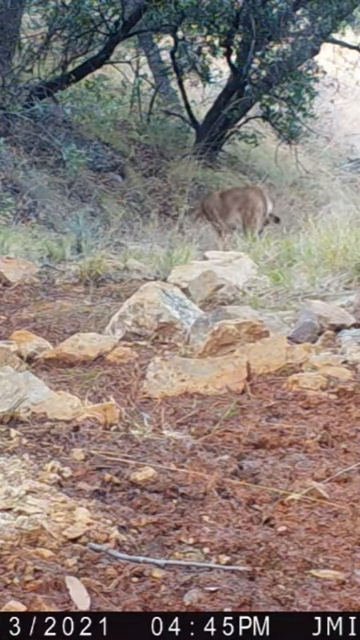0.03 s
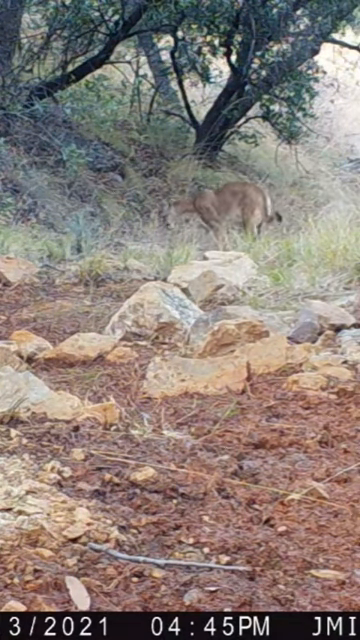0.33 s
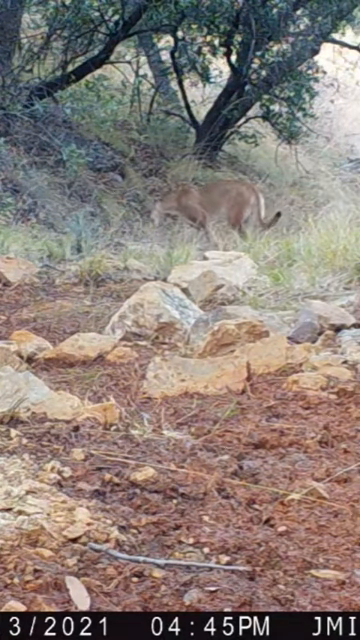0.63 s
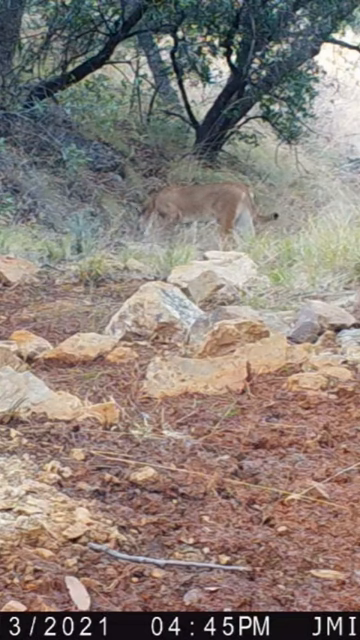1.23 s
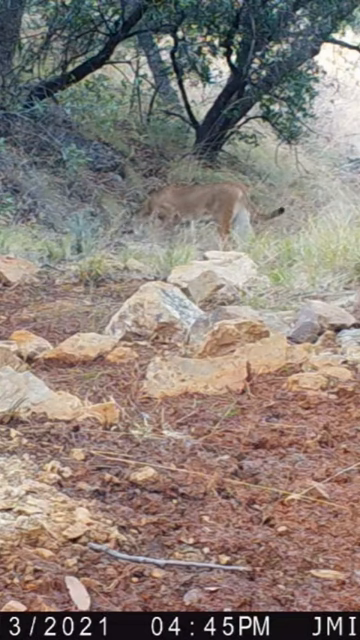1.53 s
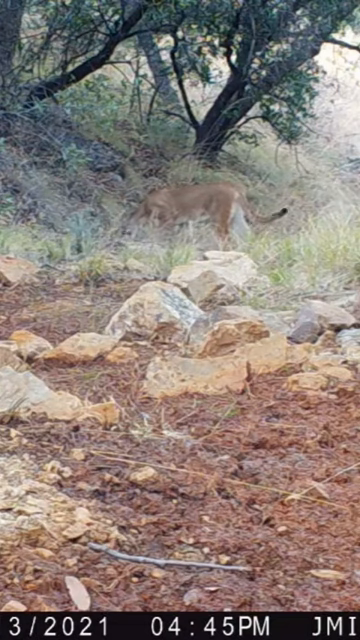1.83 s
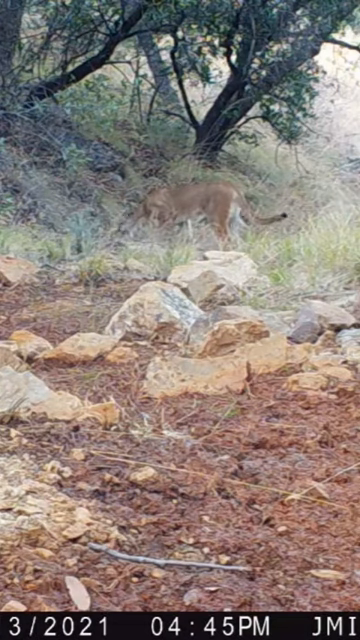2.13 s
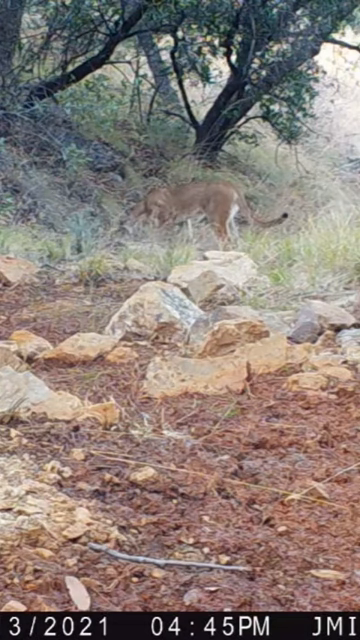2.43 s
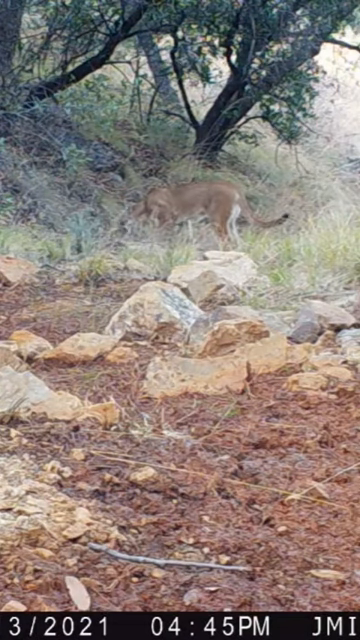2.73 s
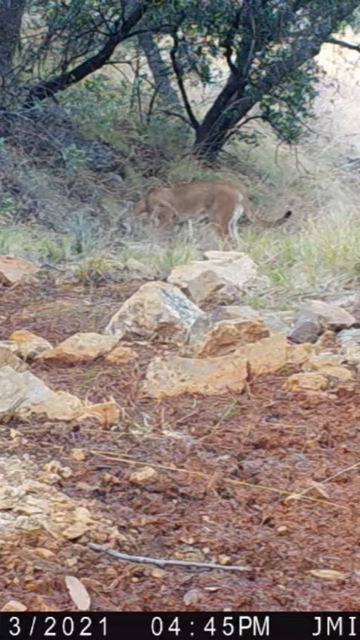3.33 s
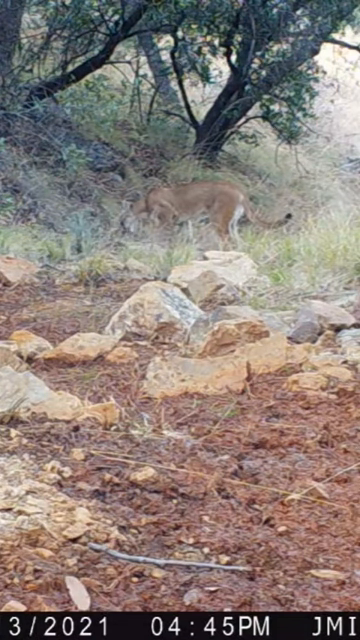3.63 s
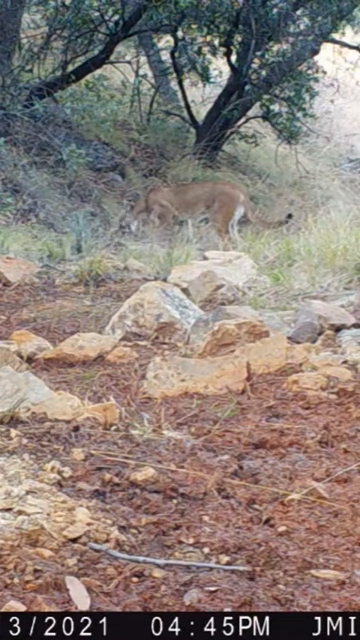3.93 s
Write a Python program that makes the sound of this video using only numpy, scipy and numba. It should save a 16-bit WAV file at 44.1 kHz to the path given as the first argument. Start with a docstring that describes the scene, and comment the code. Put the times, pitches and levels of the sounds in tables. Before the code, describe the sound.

Four hoarse, hissing screams from a big cat, most sinking into a rough yowl.

```python
"""A cougar screams four times in a wooded gully, heard by a trail camera over faint steady noise.
Each cry opens as a rasping hiss, jaws wide: air chopped by the throat rings the mouth resonances.
The first three sink into a rough, voiced yowl as the mouth closes. The slopes echo briefly,
dry grass rustles softly, and the hiss overloads the camera's microphone amplifier."""
import sys
import numpy as np
from scipy import signal
from scipy.fft import rfft, irfft
from scipy.io import wavfile
from scipy.ndimage import map_coordinates
from numba import njit

SR = 44100
rng = np.random.default_rng(int(sys.argv[2]) if len(sys.argv) > 2 else 0)


def dump(signal):
    """Clip the signal to [-1, 1] and save it as 16-bit WAV at the path in sys.argv[1]."""
    limited = np.clip(np.atleast_2d(signal).T, -1, 1)
    pcm = np.round(limited * 32767).astype(np.int16)
    wavfile.write(sys.argv[1], SR, pcm)


N = 176400
T = np.arange(N) / SR


def scream():
    """Rasping breath drives throat and hiss; the jaws open and close, moving the resonances."""
    # breath, one curve per cry: time_s, throat_db, hiss_db
    cries = [
        [(1.408, -40, -60), (1.422, -31.5, -38), (1.472, -21.5, -43), (1.53, -21, -45), (1.556, -17.5, -37),
         (1.57, -19, -64), (1.618, -19, -46), (1.7, -31.5, -51.5)],
        [(2.015, -45.5, -43.5), (2.051, -23, -31.5), (2.067, -23.5, -23.5), (2.175, -13.5, -29),
         (2.253, -16.5, -42), (2.337, -25.5, -45.5), (2.357, -22, -46), (2.365, -33, -52.5), (2.375, -29, -49),
         (2.385, -24.5, -52), (2.417, -25.5, -49), (2.495, -32.5, -61)],
        [(2.915, -46.5, -55), (2.959, -22, -23), (3.029, -19, -21.5), (3.129, -14, -28.5), (3.177, -13.5, -35),
         (3.221, -19, -40), (3.245, -18, -39.5), (3.267, -19, -40.5), (3.349, -26.5, -51), (3.361, -47, -50),
         (3.369, -21, -51), (3.41, -33.5, -58)],
        [(3.85, -47, -52), (3.882, -28, -23.5), (3.894, -19.5, -24.5), (3.922, -23, -22), (3.934, -13, -25),
         (3.944, -22, -21.5), (3.995, -19, -23)],
    ]
    # mouth resonances, one curve per cry: time_s, first_hz, second_hz
    mouths = [
        [(1.39, 750, 2200), (1.425, 1160, 2300), (1.465, 1250, 2480), (1.505, 1515, 2390), (1.555, 1315, 1950),
         (1.61, 926, 1410), (1.71, 693, 1160)],
        [(2.01, 716, 2030), (2.05, 1230, 2080), (2.11, 1590, 2540), (2.18, 1510, 2160), (2.25, 966, 1480),
         (2.34, 730, 1260), (2.5, 587, 1060)],
        [(2.91, 600, 2070), (2.96, 1480, 2320), (3.06, 1685, 2303), (3.125, 1495, 1965), (3.175, 932, 1550),
         (3.25, 804.3, 1247), (3.42, 630, 1050)],
        [(3.84, 640, 2110), (3.885, 1270, 2320), (3.93, 1710, 2240), (4.0, 1730, 2470)],
    ]
    shut_hz, open_hz = 1120, 2340  # second resonance
    throat_db, hiss_db = track(cries, 1), track(cries, 2)
    first_hz, second_hz = track(mouths, 1), track(mouths, 2)
    jaw = np.clip((second_hz - shut_hz) / (open_hz - shut_hz), 0, 1)  # 0 nearly shut, 1 wide
    force_db = 0.38 * np.maximum(hiss_db + 31.5, 0)  # hard-blown hiss grows faster
    breath = rasp()
    low = throat(breath, first_hz, second_hz, jaw, force_db) * undb(throat_db + 0.25 * force_db)
    high = hiss(breath, first_hz, jaw) * undb(hiss_db + force_db)
    return (low + high) * gate(cries, fade_s=0.015)


def rasp():
    """Four streams of turbulent air, chopped into the same uneven puffs by the flapping throat."""
    flap_hz, steady_share, decay_cycles = 171.9, 0.71, 0.22
    cycles = np.cumsum(flap_hz * np.exp(0.45 * walk(150))) / SR
    size = undb(-0.5 * rng.standard_normal(4000))[cycles.astype(int)]
    puffs = steady_share + (1 - steady_share) * size * np.exp(-(cycles % 1) / decay_cycles)
    return unit(puffs) * rng.standard_normal((4, N))


def throat(breath, first_hz, second_hz, jaw, force_db):
    """Two moving mouth resonances, a third with the jaws wide, and a broad rush of air."""
    # rush spectrum: freq_hz, density_db
    rush_spectrum = [(100, -52), (250, -28), (380, 15.5), (600, 6.5), (1100, 11.5), (2400, 8), (3250, 1),
                     (3900, -15), (5000, -15), (5800, -59), (11000, -53.5)]
    blur = 1 + 0.74 * force_db  # hard blowing widens the resonances
    first = resonance(breath[0], first_hz, mix(0.42, 0.28, jaw) * blur * first_hz)
    second = resonance(breath[1], second_hz, 0.3 * blur * second_hz)
    second_gain = undb(mix(-9.5, -2.5, jaw))
    pair = (first + second_gain * second) / np.hypot(1, second_gain)
    third = jaw * undb(-13.5) * resonance(breath[0], hz=3852, width_hz=840)
    rush = undb(-15.5) * colour(breath[2], rush_spectrum)
    return (pair + third + rush) * undb(mix(-5, 0.5, jaw))


def hiss(breath, first_hz, jaw):
    """A high band that rises with the first resonance and thins to a whistle as the jaws close."""
    shut_hz, open_hz = 4570, 4827
    opening = np.minimum(jaw / 0.11, 1)
    centre_hz = mix(shut_hz, open_hz, opening) + 0.21 * (first_hz - 1500)
    band = resonance(breath[3], centre_hz, width_hz=mix(330, 590, jaw))
    whistle = resonance(breath[0], 6620 * np.sqrt(centre_hz / open_hz), width_hz=870)
    overtone = undb(-23.5) * resonance(breath[1], hz=7350, width_hz=870)
    return (band + undb(mix(-5, -20.5, jaw)) * (whistle + overtone)) * undb(-1.5 * opening)


def yowl():
    """The vocal folds catch and sink in pitch, unsteady in period and strength."""
    # voiced ends of the first three cries: time_s, pitch_hz, level_db
    yowls = [
        [(1.49, 447, -63), (1.6, 405, -24.5), (1.65, 367, -24.5), (1.7, 317, -33.5)],
        [(2.2, 450, -28), (2.25, 435, -24.5), (2.3, 414.5, -28), (2.335, 364.8, -27.5), (2.36, 358, -25),
         (2.41, 346.8, -26), (2.46, 325, -35), (2.5, 323, -40)],
        [(3.13, 441.5, -34), (3.17, 424.1, -23.5), (3.215, 410.9, -22), (3.25, 360, -26.5), (3.295, 358, -24.5),
         (3.33, 349, -34), (3.365, 337, -22.5), (3.41, 320.7, -44)],
    ]
    # harmonics, fundamental first: level_db
    harmonics_db = [-12.5, -1, -9, -18.5, -47.5]
    # voice quality per yowl: jitter_share, overtone_gain_db
    voices = [(0.0456, -15), (0.019, 2), (0.02, 2)]
    which = np.searchsorted([curve[0][0] - 0.1 for curve in yowls[1:]], T)
    jitter, overtone_db = np.array(voices)[which].T
    pitch_hz = track(yowls, 1) * (1 + jitter * walk(148.2))
    phase = 2 * np.pi * np.cumsum(pitch_hz) / SR
    voice = sum(undb(db + (k > 1) * overtone_db) * np.sin(k * phase)
                for k, db in enumerate(harmonics_db, 1))
    shimmer_db = 1.5 * walk(170)
    catch_db = np.minimum(2 * walk(53), 0)
    level = unit(undb(shimmer_db + catch_db)) * undb(track(yowls, 2) - 1)
    return np.sqrt(2) * voice * level * gate(yowls, fade_s=0.0066)


def gully(x):
    """Adds quick scatter from ground and rocks, then a dull echo from the slopes."""
    scatter_decay_s, echo_rise_s, echo_t60_s, echo_width_hz = 0.012, 0.039, 0.57, 850
    scatter = rng.standard_normal(N) * np.exp(-T / scatter_decay_s)
    echo = resonance(rng.standard_normal(N), hz=1310, width_hz=echo_width_hz)
    echo *= undb(-60 * T / echo_t60_s) * (1 - np.exp(-T / echo_rise_s))
    echo_gain = undb(-13) * np.sqrt(np.pi * echo_width_hz / SR)
    response = (undb(-7) * unit(scatter) + echo_gain * unit(echo)) / np.sqrt(N)
    return x + signal.fftconvolve(x, response)[:N]


def grass():
    """Dry grass rustles in short, grainy swells."""
    # rustles: peak_s, level_db
    rustles = [(.37, -51), (.82, -56), (1.2, -56.5), (1.72, -57), (2.0, -58.5), (2.64, -58)]
    half_width_s = 0.062
    swells = sum(undb(db) * np.exp(-((T - peak_s) / half_width_s) ** 2) for peak_s, db in rustles)
    band = microphone(resonance(rng.standard_normal(N), hz=5200, width_hz=3200))
    return band * swells * undb(1.9 * walk(90))


def background():
    """Steady background noise with a faint, thin hiss near 11 kHz, and a flickering high band."""
    # background spectrum: freq_hz, density_db
    background_spectrum = [(18, -61.5), (30, -19.5), (163, -10), (199, -6.5), (289, -5.5), (327, -5),
                           (371, -6), (409, 0), (625, -1), (843, 1.5), (2220, -5), (3570, -14.5),
                           (4810, -15.5), (6490, -25), (7530, -36.5), (10700, -28.5), (11500, -40),
                           (15000, -68.5), (22000, -120)]
    flicker = resonance(rng.standard_normal(N), hz=4870, width_hz=810) * undb(-61 + 3 * walk(40))
    return undb(-45) * colour(rng.standard_normal(N), background_spectrum) + flicker


def microphone(x, cutoff_hz=7490):
    """The microphone picks up little of the highest treble."""
    return signal.sosfilt(signal.butter(10, cutoff_hz, fs=SR, output="sos"), x)


def undb(db):
    return 10 ** (np.asarray(db) / 20)


def unit(x):
    return x / np.sqrt(np.mean(x ** 2))


def mix(a, b, share):
    return a + (b - a) * share


def walk(rate_hz):
    """Smooth random curve, RMS 1."""
    knots = rng.standard_normal(4000)
    return unit(map_coordinates(knots, [T * rate_hz], order=3, mode="wrap"))


def colour(x, spectrum):
    """Filters by (freq_hz, gain_db) points; RMS 1."""
    hz, db = np.array(spectrum, float).T
    bin_hz = np.maximum(np.arange(N // 2 + 1) * SR / N, 1)
    gain = undb(np.interp(np.log(bin_hz), np.log(hz), db))
    return unit(irfft(rfft(x) * gain, N))


@njit
def svf(x, hz, width_hz):
    """Moving band-pass, gain 1 at the centre."""
    y, band_state, low_state = np.empty(len(x)), 0., 0.
    for i in range(len(x)):
        g, damping = np.tan(np.pi * hz[i] / SR), width_hz[i] / hz[i]
        band = (band_state + g * (x[i] - low_state)) / (1 + g * (g + damping))
        band_state = 2 * band - band_state
        low_state += 2 * g * band
        y[i] = damping * band
    return y


def resonance(x, hz, width_hz):
    """Steep resonance that keeps the power of white noise."""
    hz, width_hz = hz + np.zeros(N), width_hz + np.zeros(N)
    return svf(svf(x, hz, width_hz), hz, width_hz) * np.sqrt(2 * SR / np.pi / width_hz)


def track(curves, column):
    """One column of a list of curves, joined through time."""
    rows = np.vstack(curves)
    return np.interp(T, rows[:, 0], rows[:, column])


def gate(curves, fade_s):
    """1 during each curve, dying away outside it."""
    outside_s = np.min([np.maximum(c[0][0] - T, T - c[-1][0]) for c in curves], axis=0)
    return np.exp(-np.maximum(outside_s, 0) / fade_s)


def scene():
    """The cougar and its echo over grass and background noise, mono."""
    cougar = microphone(gully(scream() + yowl()))
    return (cougar + grass() + background())[None]


def record(dry):
    """The amplifier clips unevenly on loud treble, adding low crackle and fizz; the top is cut."""
    emphasis_hz, fizz_hz, bottom_hz, top_hz = 1085, 8500, 22, 11400
    emphasis = [1, -np.exp(-2 * np.pi * emphasis_hz / SR)]
    clipped = np.clip(signal.lfilter(emphasis, [1], dry), -0.07, 0.096)
    overloaded = signal.lfilter([1], emphasis, clipped)
    fizz = signal.sosfiltfilt(signal.butter(2, fizz_hz, "high", fs=SR, output="sos"), overloaded - dry)
    out = overloaded + undb(3) * fizz
    out = signal.sosfilt(signal.butter(2, bottom_hz, "high", fs=SR, output="sos"), out)
    return signal.sosfilt(signal.ellip(10, 0.2, 90, top_hz, fs=SR, output="sos"), out)


dry = scene()
out = record(dry)
dump(out)
```